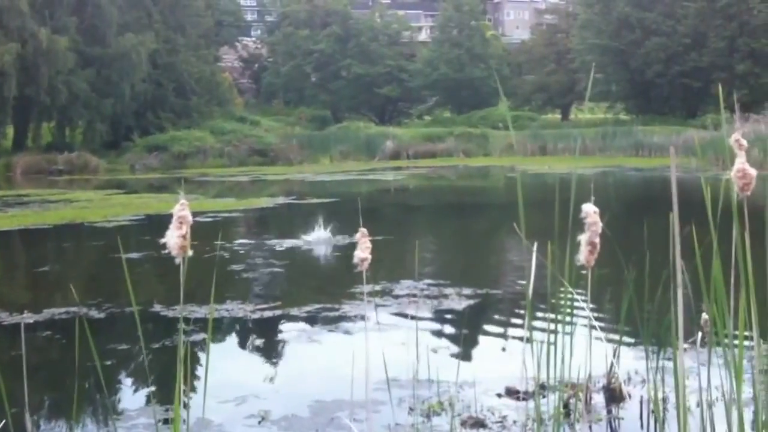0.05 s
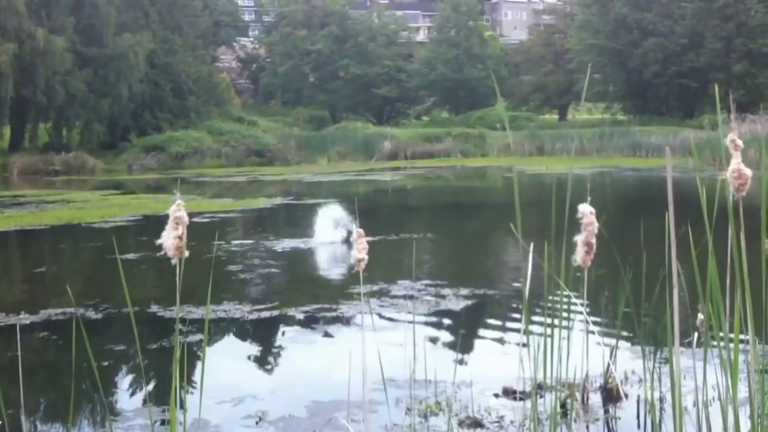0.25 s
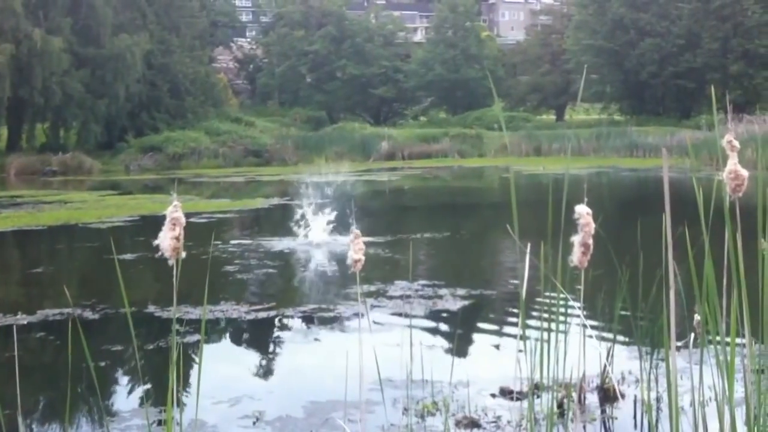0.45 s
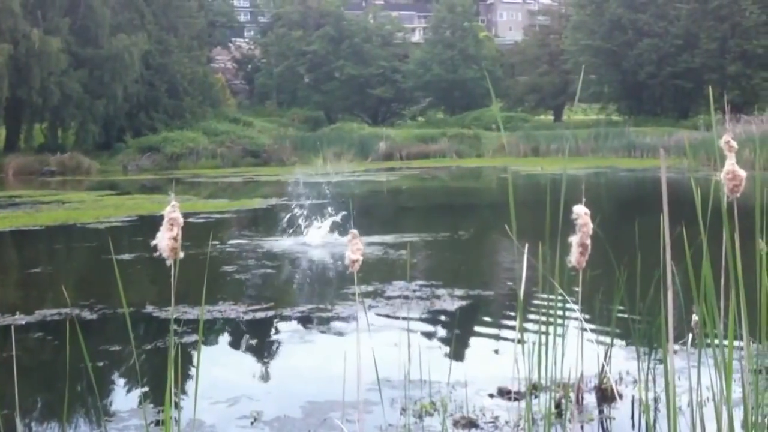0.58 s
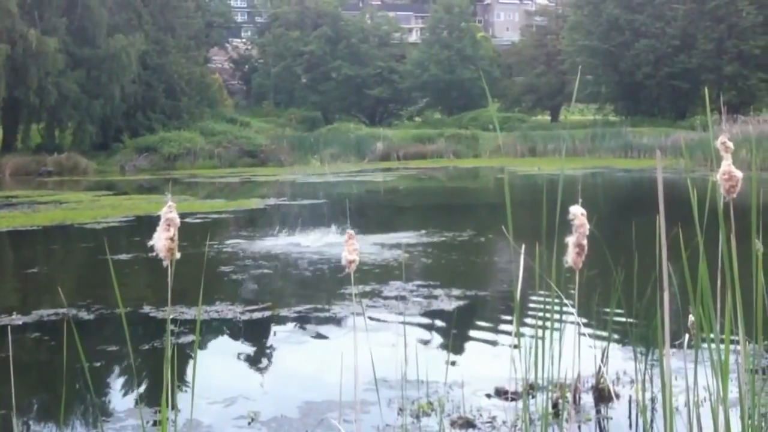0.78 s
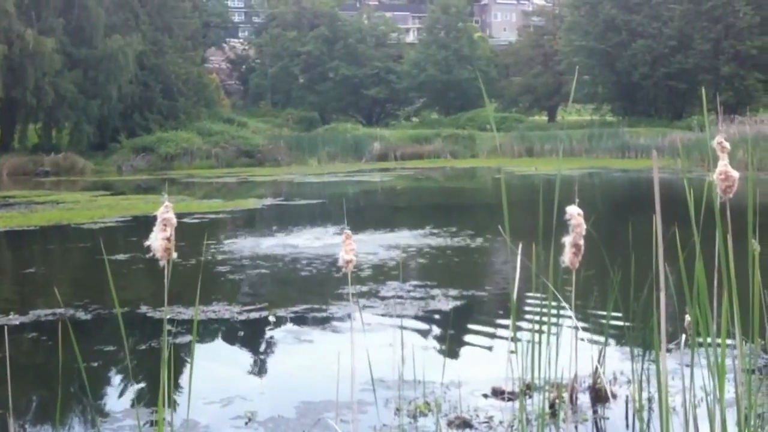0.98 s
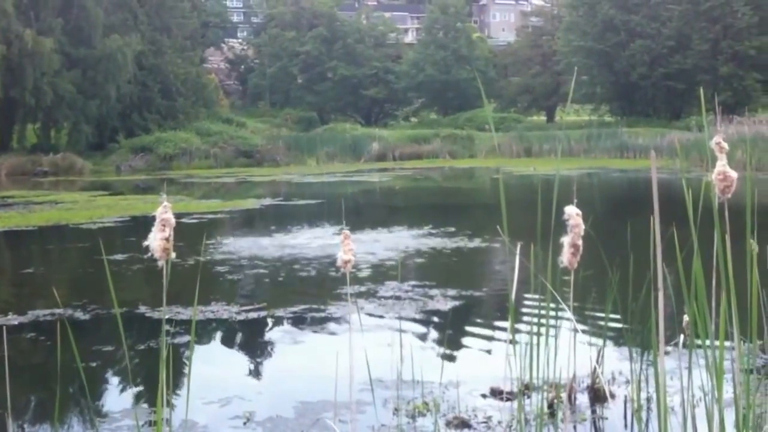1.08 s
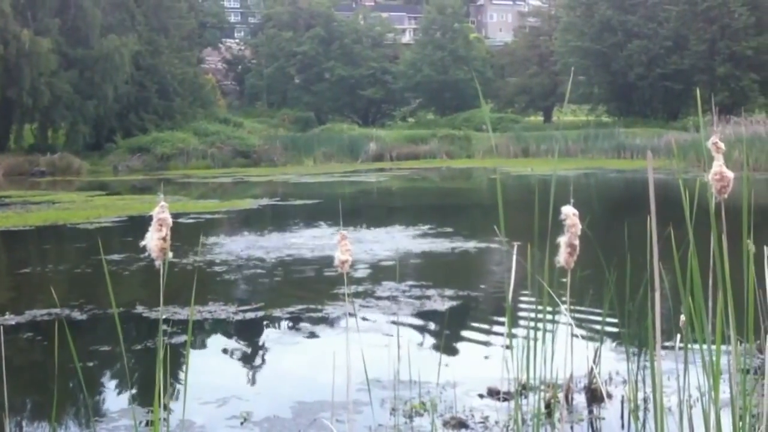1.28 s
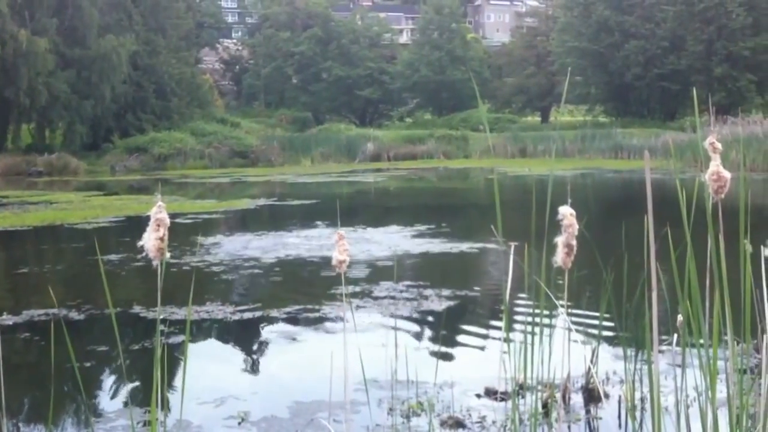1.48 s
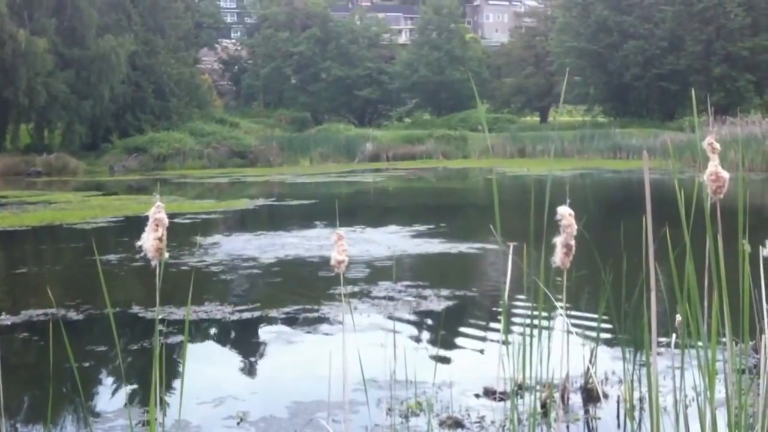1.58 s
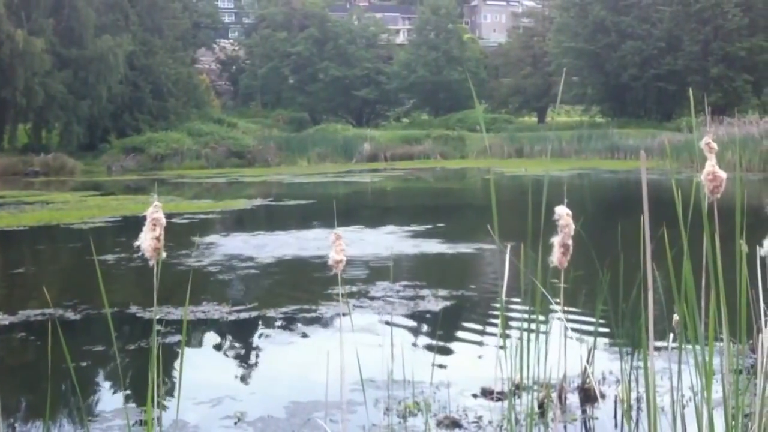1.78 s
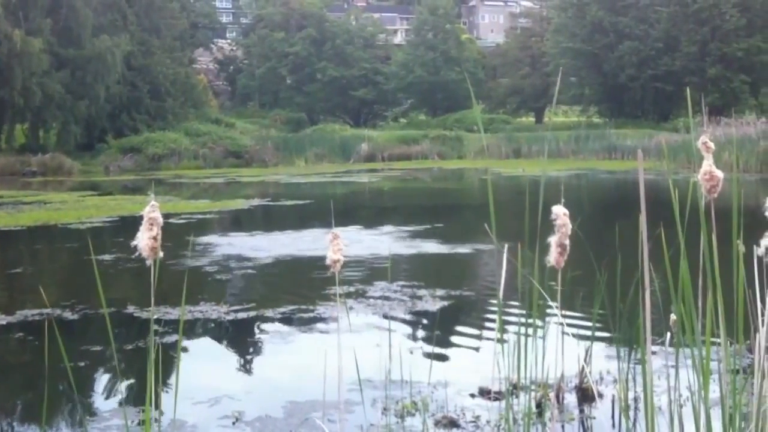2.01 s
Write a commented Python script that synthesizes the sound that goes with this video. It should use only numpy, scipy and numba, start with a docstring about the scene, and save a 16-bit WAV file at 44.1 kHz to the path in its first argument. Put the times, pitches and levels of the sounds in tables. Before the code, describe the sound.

Outdoors at a pond, mono microphone at some distance: a faint water stir, a hard flat beaver tail slap, a bubbly plunge and falling splash, sparse ticking drops, one short nasal bird call, soft town hum.

```python
"""A beaver slaps its tail on a pond and dives: the flat blow cracks (noise) and squeezes out an air pocket (resonances).
Reeds and banks scatter it as decaying noise. Moving and falling water is a patter of many small bubbles.
Closing air cavities gulp as damped sines rising in pitch; late drops tick as noise bursts amid a chirping drizzle.
A bird calls once, in harmonics and rasp, over a distant hum of town traffic: coloured noise and wavering drones."""
import sys
import numpy as np
from scipy import signal
from scipy.fft import rfft, irfft
from scipy.io import wavfile
from scipy.ndimage import uniform_filter1d
from numba import njit

SR = 44100
rng = np.random.default_rng(int(sys.argv[2]) if len(sys.argv) > 2 else 0)


def put_to_file(sound):
    """Save the sound as 16-bit audio at rate SR, in the file named by the first command-line argument."""
    columns = np.atleast_2d(sound).T  # one column per channel
    safe = np.clip(columns, -1, 1)
    whole_steps = np.round(safe * 32767)
    wavfile.write(sys.argv[1], SR, whole_steps.astype(np.int16))


N = 90404

# distant town colour: f/Hz, level/dB
TOWN_COLOUR = [(25, -22), (55, -31), (88, -7), (120, -12), (160, -11.5), (200, -7.5), (285, -7),
               (400, -13.5), (840, -12.5), (1610, -19.5), (2400, -27.5), (16000, -33)]
# town drones: f/Hz, wander width/Hz, level/dB
DRONES = [(155.5, 2.8, -64.5), (95.8, 13.76, -85), (241.2, 10.5, -76)]
# common swelling of the drones: t/s, level/dB
DRONE_LEVEL = [(0, -8), (.16, 1.5), (.4, -4), (.72, 3.5), (1.02, -5.5), (1.4, -4), (1.75, 1), (2.05, 3)]
# masses of water moving or falling: peak t/s, rise/s, fall/s, slosh level/dB, spatter level/dB, fizz level/dB
SPLASHES = [(0.013, 0.011, 0.046, -58.5, -58, -65.5), (0.408, 0.0064, 0.01, -66, -49, -47),
            (.416, 0.0014, .017, -47.5, -44, -53), (0.455, 0.033, 0.047, -47, -51.5, -59.5),
            (0.504, 0.054, 0.26, -53, -57.5, -58), (0.659, 0.033, 0.043, -50.5, -52, -62.5),
            (.769, 0.0017, 0.0086, -47.5, -49, -73), (.82, 0.026, 0.025, -61.5, -58, -62.5),
            (.858, 0.011, 0.04, -56, -53, -57), (1.05, 0.15, 0.11, -61, -52.5, -62.5),
            (1.1, 0.0029, 0.031, -53, -49.5, -56.5), (1.33, 0.35, 0.24, -80, -65, -59.5),
            (1.495, 0.12, 0.076, -84, -74, -61.5)]
# large bubbles, colour: f/Hz, level/dB
SLOSH_COLOUR = [(120, -34), (220, -11), (330, -7), (480, -5.5), (680, 1.5), (900, -9), (1200, 0.5),
                (1600, -12), (2600, -25)]
# drops, colour: f/Hz, level/dB
SPATTER_COLOUR = [(700, -15), (1400, -5.5), (2300, 2.5), (3100, -4), (4200, -4), (6000, -9.5),
                  (8500, -11.5)]
# fine spray, colour: f/Hz, level/dB
FIZZ_COLOUR = [(3000, -9.5), (5000, -5), (6500, -4.5), (9000, -5), (13000, -4), (16000, -17.5)]
# single bubbles and closing air cavities: t/s, f/Hz, level/dB, decay/s
GULPS = [(.018, 240, -50.5, 0.022), (0.049, 347, -52.5, 0.023), (.451, 302, -38, 0.011),
         (.455, 124, -36.5, 0.0071), (.4583, 623, -40.5, .003), (.466, 559, -43, .012),
         (0.486, 97, -49, 0.026), (.516, 235, -40, 0.0056), (.532, 430, -49, .01),
         (0.543, 189, -47, 0.0096), (1.581, 1810, -49.5, 0.0043)]
# tail meeting water, edge then flat: t/s, crack level/dB, crack decay/s, air pocket level/dB
CONTACTS = [(.2317, -25, 0.0025, -27.5), (0.2354, -25.5, 0.0018, -12.5)]
# resonances of the air trapped under the tail: f/Hz, level/dB
POCKET_RESONANCES = [(80, -27), (210, -18.5), (380, -1), (560, -4.5), (790, -3.5), (950, -25), (1100, -0.5),
                     (1280, 5), (1530, -9), (1900, -0.5), (2300, -5.5), (2750, -16), (4300, -15),
                     (8000, -31), (15000, -29)]
# crack colour: f/Hz, level/dB
CRACK_COLOUR = [(150, -21), (500, 1), (950, -8), (1400, -8), (2300, 4), (5800, 0), (7200, -5.5),
                (8800, 0.5), (10500, -4), (13000, -8), (16000, -21)]
# scatter from reeds and banks, colour: f/Hz, level/dB
BANKS_COLOUR = [(80, -19), (200, -27), (420, 10), (950, -11.5), (2400, -6), (6000, -14), (15000, -16.5)]
# single late drops: t/s, level/dB, centre f/Hz, decay/s
DROPS = [(.5835, -47, 11000, 0.00071), (1.099, -45, 1020, 0.0019), (1.145, -47, 2610, 0.0017),
         (1.1808, -43.5, 4250, 0.0009), (1.326, -54, 8000, 0.0015), (1.216, -49, 4630, 0.0062),
         (1.284, -48, 4670, 0.0022), (1.357, -47, 6000, 0.0023), (1.3642, -46, 6000, .0006),
         (1.405, -46.5, 4400, .003), (1.476, -49.5, 7100, 0.0022), (1.5397, -47, 5600, 0.0017),
         (1.5742, -48, 4900, 0.0046), (1.6465, -48.5, 10600, .0015), (1.654, -50, 12500, 0.0017),
         (1.7034, -50, 12800, 0.0012), (1.736, -49, 10700, .001)]
# drizzle of tiny ringing bubbles, colour: f/Hz, level/dB
DRIP_COLOUR = [(1800, -8), (3000, 1), (5000, 6.5), (8000, -2.5), (12000, -13), (15000, -1)]
# bird call harmonics: multiple of the fundamental, level/dB
CALL_HARMONICS = [(2, -6), (3, -11.5), (4, -10.5), (5, 2.5), (6, -1.5), (7, -3.5), (8, -15)]
# bird rasp colour: f/Hz, level/dB
RASP_COLOUR = [(800, -8), (1600, -2), (2800, -12), (4200, -0.5), (5400, -15), (7000, -20), (14000, -14)]

TOWN_DB = -61.5
GULP_RISE_PER_S = 4.1  # share of the starting pitch
FIRST_TOUCH_DB = -44  # tail grazes the water just before the blow
NEAR_DB, NEAR_DECAY_S, FAR_DB, FAR_DECAY_S = -42.5, 0.0076, -50, 0.068
WATER_LOW_HZ = 69.5  # blow, splash and gulps carry little below this
DROP_WIDTH_DB = 9.5  # fall of a tick's spectrum one octave from centre
DRIP_DB, DRIP_PEAK_S, DRIP_RISE_S, DRIP_FALL_S = -60, 1.32, 0.55, 0.18
CALL_S, CALL_LENGTH_S, CALL_HZ, CALL_FALL_HZ, CALL_DB, RASP_DB = 1.749, 0.066, 788, 75, -54, -57
TOP_HZ = 15900


def undb(db):
    """Decibels to amplitude ratio."""
    return 10 ** (np.asarray(db) / 20)


def unit(x):
    """Scale to rms 1."""
    return x / np.sqrt(np.mean(x ** 2) + 1e-20)


def clock():
    """Time of every sample, in seconds."""
    return np.arange(N) / SR


def spectrum_hz():
    """Frequency of every FFT bin, at least 1 Hz so that its log exists."""
    return np.maximum(np.arange(N // 2 + 1) * SR / N, 1)


def curve_gain(f_hz, hz, db):
    """Gain interpolated in dB over log frequency."""
    return undb(np.interp(np.log(f_hz), np.log(hz), db))


def colour(x, points):
    """Filter by a (Hz, dB) curve with 12 dB/octave skirts; the result has rms 1."""
    hz, db = np.array(points, float).T
    f_hz = spectrum_hz()
    skirts = np.minimum(f_hz / hz[0], 1) ** 2 * np.minimum(hz[-1] / f_hz, 1) ** 2
    return unit(irfft(rfft(x) * skirts * curve_gain(f_hz, hz, db), N))


def noise(points):
    """Coloured noise, rms 1."""
    return colour(rng.standard_normal(N), points)


def swell(at_s, rise_s, fall_s):
    """Exponential rise to a peak of 1, then exponential fall."""
    t = clock() - at_s
    return np.exp(np.minimum(t / rise_s, -t / fall_s))


def walk(rate_hz):
    """Slow random wavering, rms 1."""
    hold = int(SR / rate_hz)
    steps = rng.standard_normal(N)[np.arange(N) // hold]
    return unit(uniform_filter1d(steps, hold))


@njit
def bubbles(at_s, hz, size, decay_s, rise_per_s):
    """Damped oscillations whose pitch climbs by the share rise_per_s each second."""
    out = np.zeros(N)
    for k in range(len(at_s)):
        first = int(at_s[k] * SR) + 1
        end = min(N, first + int(7 * decay_s[k] * SR))
        for i in range(max(first, 0), end):
            t = i / SR - at_s[k]
            cycles = hz[k] * t * (1 + rise_per_s[k] * t / 2)
            out[i] += size[k] * np.exp(-t / decay_s[k]) * np.sin(2 * np.pi * cycles)
    return out


def patter(points, count, cycles, spread_db, glide):
    """Steady rain of small bubbles of very unequal size; glide = pitch rise per decay time."""
    when, pitch, strength, length, sign = rng.random((count, 5)).T
    low_hz, high_hz = points[0][0], points[-1][0]
    hz = low_hz * (high_hz / low_hz) ** pitch
    decay_s = cycles * (0.44 + length ** 2) / hz
    size_db = -spread_db * np.log(1 - .985 * strength)  # few large, many small
    size = undb(size_db) * np.sign(sign - .5) * hz
    return colour(bubbles(when * N / SR, hz, size, decay_s, glide / decay_s), points)


def ring(points):
    """Minimum-phase response of a resonant cavity to one sharp push, peak 1."""
    hz, db = np.array(points, float).T
    cepstrum = irfft(np.log(curve_gain(spectrum_hz(), hz, db)), N)
    # folding the cepstrum makes it causal
    cepstrum[1:N // 2] *= 2
    cepstrum[N // 2 + 1:] = 0
    response = irfft(np.exp(rfft(cepstrum)), N)
    return response / np.abs(response).max()


def highpass(x, hz, order):
    """Butterworth bass cut."""
    return signal.sosfilt(signal.butter(order, hz, "high", fs=SR, output="sos"), x)


def town():
    """Soft far rumble; engine drones waver separately and swell together."""
    out = undb(TOWN_DB) * noise(TOWN_COLOUR) * undb(0.99 * walk(14))
    swelling_db = np.interp(clock(), *np.array(DRONE_LEVEL).T)
    for hz, width_hz, db in DRONES:
        phase = 2 * np.pi * np.cumsum(hz + width_hz / 2 * walk(24.33)) / SR
        drone = unit(np.sin(phase) * undb(1.3 * walk(11.9)))
        out = out + undb(db + swelling_db) * drone
    return out


def splash():
    """Every mass of water breaks into large bubbles, drops and fine spray; their powers add."""
    grains = [patter(SLOSH_COLOUR, count=3600, cycles=2.24, spread_db=2.5, glide=0.031),
              patter(SPATTER_COLOUR, count=7000, cycles=1.28, spread_db=1.0, glide=0.067),
              patter(FIZZ_COLOUR, count=11000, cycles=1.2, spread_db=3.0, glide=0.014)]
    power = np.zeros((3, N))
    for at_s, rise_s, fall_s, *db in SPLASHES:
        power += (undb(db)[:, None] * swell(at_s, rise_s, fall_s)) ** 2
    return np.sum(np.sqrt(power) * grains, axis=0)


def gulps():
    """Pockets of air ring and rise in pitch as the water closes."""
    at_s, hz, db, decay_s = np.array(GULPS, float).T.copy()
    return bubbles(at_s, hz, undb(db), decay_s, np.full(len(at_s), float(GULP_RISE_PER_S)))


def slap():
    """Each contact cracks and rings the trapped air; reeds and banks return a short and a long tail."""
    crack, pocket = noise(CRACK_COLOUR), ring(POCKET_RESONANCES)
    out = undb(FIRST_TOUCH_DB) * crack * swell(CONTACTS[0][0] - .002, 0.00048, 0.0015)
    for at_s, crack_db, crack_decay_s, pocket_db in CONTACTS:
        out = out + undb(crack_db) * crack * swell(at_s, .0003, crack_decay_s)
        out = out + undb(pocket_db) * np.roll(pocket, int(at_s * SR))
    flat_s = CONTACTS[-1][0]
    near = undb(NEAR_DB) * swell(flat_s, 0.00055, NEAR_DECAY_S)
    far = undb(FAR_DB) * swell(flat_s, .001, FAR_DECAY_S)
    return out + noise(BANKS_COLOUR) * (near + far)


def drops():
    """Late drops tick, each around its own pitch, among a sparse drizzle of tiny chirping bubbles."""
    drizzle = patter(DRIP_COLOUR, count=600, cycles=5, spread_db=4.0, glide=0.095)
    out = undb(DRIP_DB) * drizzle * swell(DRIP_PEAK_S, DRIP_RISE_S, DRIP_FALL_S)
    for at_s, db, hz, decay_s in DROPS:
        tick = noise([(hz / 2, -DROP_WIDTH_DB), (hz, 0), (2 * hz, -DROP_WIDTH_DB)])
        out = out + undb(db) * tick * swell(at_s, 0.00037, decay_s)
    return out


def bird():
    """Short nasal call: a raspy start, then a clean note of upper harmonics that sags."""
    u = np.clip((clock() - CALL_S) / CALL_LENGTH_S, 0, 1)  # progress through the call
    pitch_hz = (CALL_HZ - CALL_FALL_HZ * u ** 1.8) * (1 + 0.0039 * walk(320))
    phase = 2 * np.pi * np.cumsum(pitch_hz) / SR
    shape = u * (1 - u) ** 2.27
    note = sum(undb(db) * np.sin(multiple * phase) for multiple, db in CALL_HARMONICS)
    rasp = noise(RASP_COLOUR) * swell(CALL_S + .004, 0.029, 0.023)
    return undb(CALL_DB) * note * shape / shape.max() + undb(RASP_DB) * rasp


def scene():
    """Sum of all sources, one channel; bass cut on blow, splash and gulps."""
    water = highpass(slap() + splash() + gulps(), WATER_LOW_HZ, order=4)
    return (water + drops() + bird() + town())[None]


def record(dry):
    """The recorder cuts the top: elliptic lowpass."""
    return signal.sosfilt(signal.ellip(8, .2, 70, TOP_HZ, fs=SR, output="sos"), dry)


dry = scene()
out = record(dry)
put_to_file(out)
```